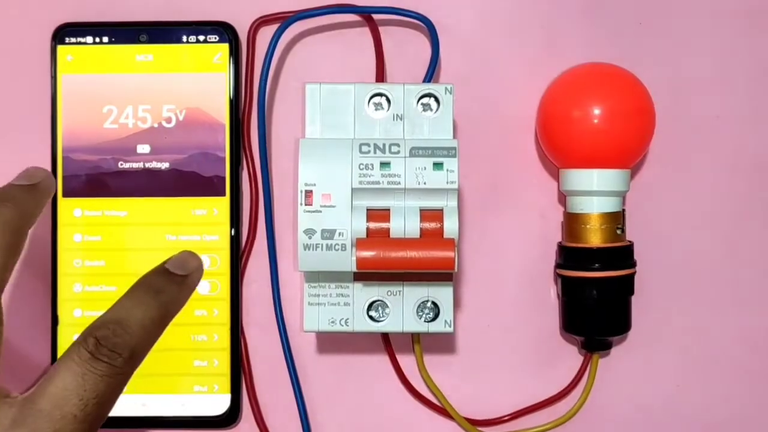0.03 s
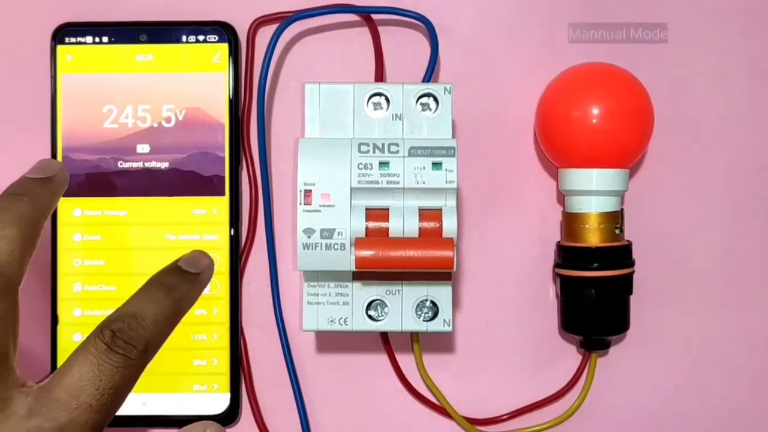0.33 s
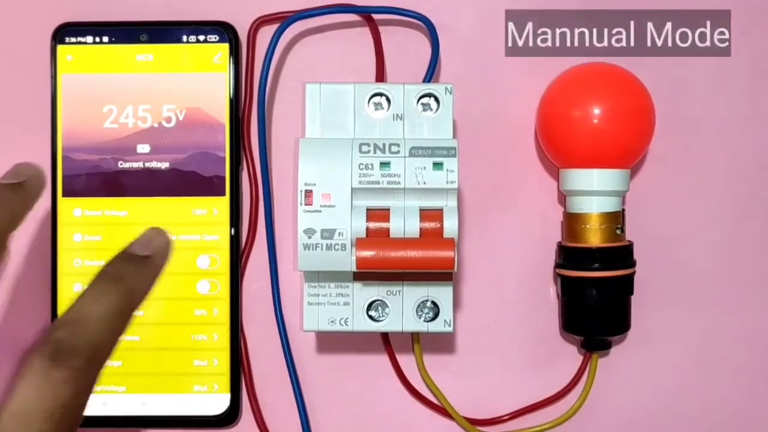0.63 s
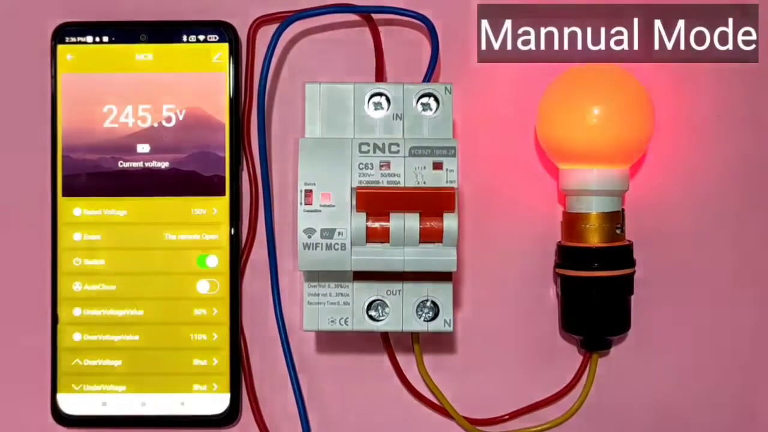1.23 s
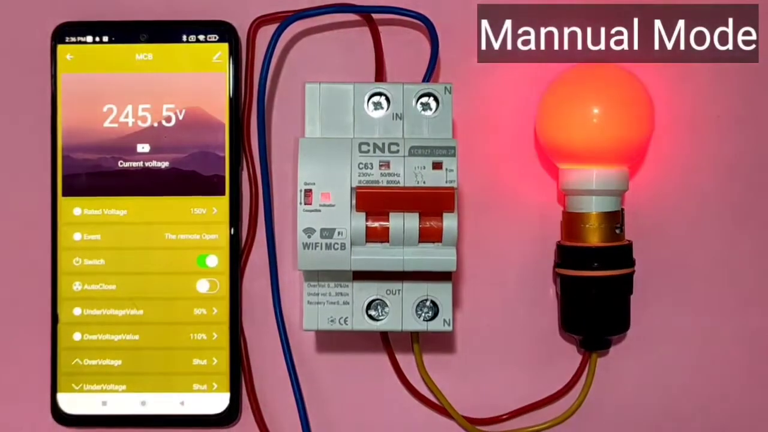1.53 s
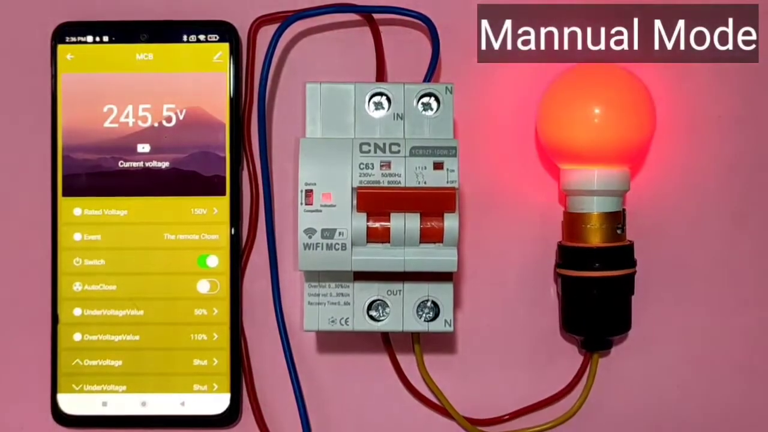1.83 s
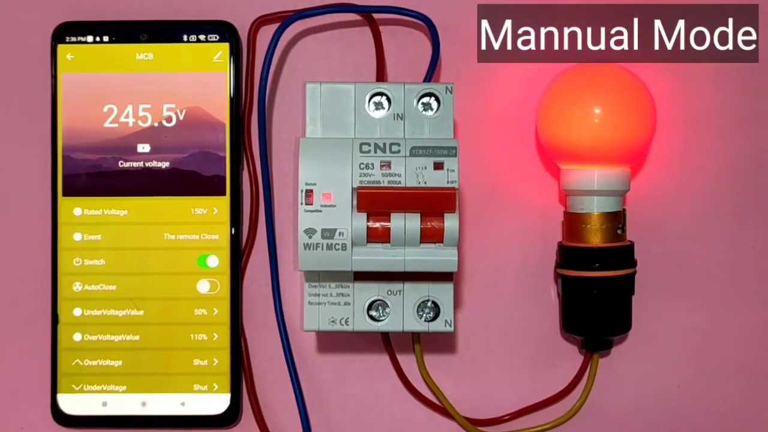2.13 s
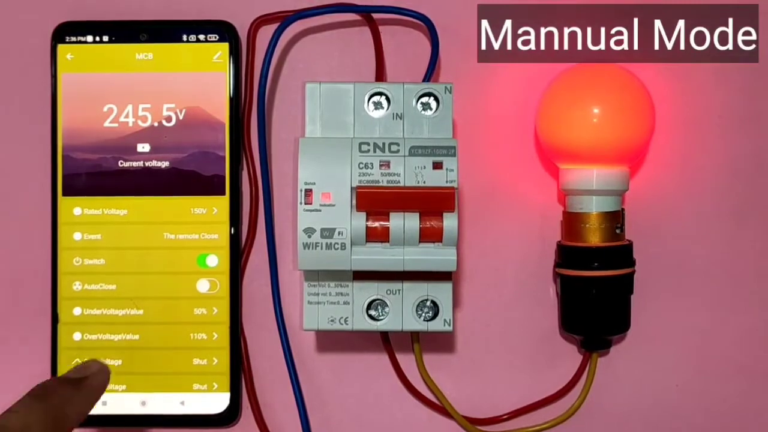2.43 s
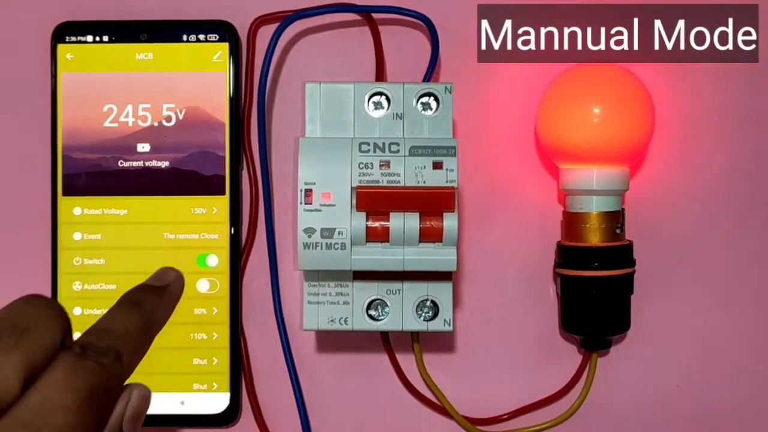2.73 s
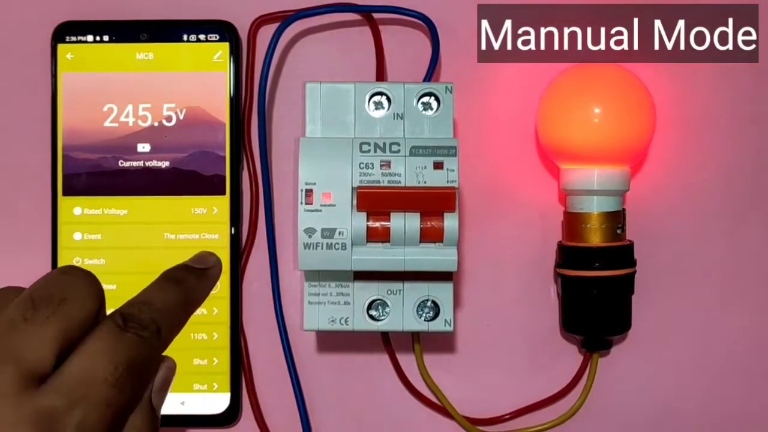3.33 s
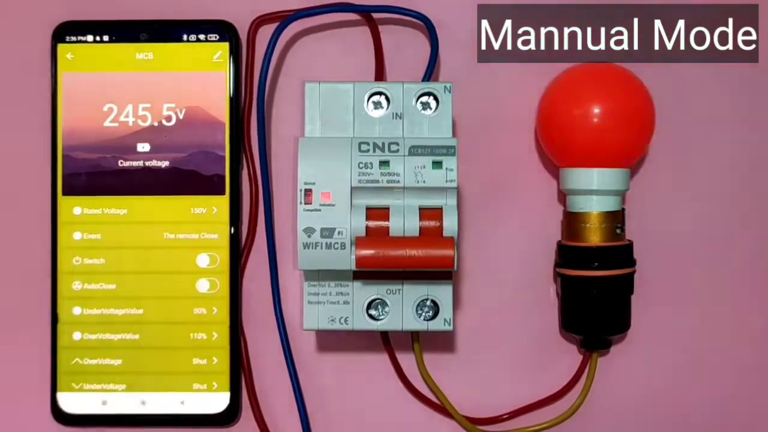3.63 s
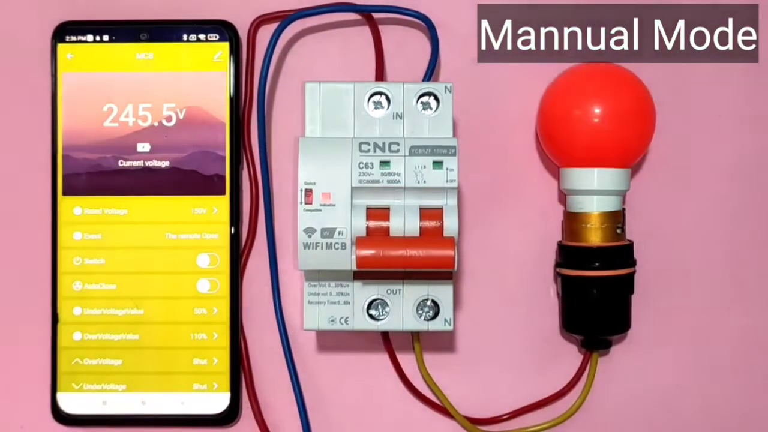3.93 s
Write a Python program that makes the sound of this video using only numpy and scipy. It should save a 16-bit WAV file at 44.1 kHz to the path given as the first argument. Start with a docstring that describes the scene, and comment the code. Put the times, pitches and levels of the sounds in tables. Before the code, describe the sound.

A circuit breaker's small motor whirrs briefly; later the breaker trips with a sharp snap.

```python
"""A motorised circuit breaker on a table in a small room. Its geared motor whirrs, slows under the
spring and latches the lever on. Later it runs briefly and trips the latch: the lever snaps off with a
crack from the case and a thud from the table. Behind it: a fan's hum, a far bird, a fingertip on a
touch screen. The right microphone is covered and hears little but bass."""
import sys
import numpy as np
from scipy import signal
from scipy.fft import rfft, irfft
from scipy.io import wavfile

SR = 44100
rng = np.random.default_rng(int(sys.argv[2]) if len(sys.argv) > 2 else 0)


def pcm_store(signal):
    """Save signal as 16-bit PCM."""
    levels = np.round(np.clip(np.atleast_2d(signal), -1, 1) * 32767)
    wavfile.write(sys.argv[1], SR, levels.astype(np.int16).T)


N = 176400
TIME = np.arange(N) / SR


def from_db(db):
    """Decibels to gain."""
    return 10 ** (np.asarray(db) / 20)


def unit_rms(x):
    """Scale to rms 1."""
    return x / np.sqrt(np.mean(x ** 2) + 1e-20)


def at_hz(points, hz):
    """Interpolate a table over log frequency."""
    knots_hz, values = np.transpose(points)
    return np.interp(np.log(np.maximum(hz, 1)), np.log(knots_hz), values)


def colour(x, spectrum):
    """Minimum-phase filter with the given gains."""
    size = 2 * N
    gain = from_db(at_hz(spectrum, np.arange(N + 1) * SR / size))
    cepstrum = irfft(np.log(gain))
    cepstrum[1:N] *= 2
    cepstrum[N + 1:] = 0
    return irfft(rfft(x, size) * np.exp(rfft(cepstrum)))[:N]


def noise(spectrum):
    """Coloured noise, rms 1."""
    gain = from_db(at_hz(spectrum, np.arange(N // 2 + 1) * SR / N))
    return unit_rms(irfft(rfft(rng.standard_normal(N)) * gain))


def drift(corner_hz):
    """Low-passed noise, rms 1."""
    hz = np.arange(N // 2 + 1) * SR / N
    return unit_rms(irfft(rfft(rng.standard_normal(N)) / (1 + (hz / corner_hz) ** 2)))


def decay(t, t60_s):
    """Step to 1 at t = 0, then exponential decay."""
    return (t >= 0) * np.exp(-np.log(1000) * np.clip(t / t60_s, 0, 10))


def room(x, delay_s=.0037, build_s=.0076):
    """Diffuse reverberation; the treble dies first."""
    # room decay (frequency [Hz], t60 [s])
    bands = [(200, .32), (1400, .33), (4000, .275), (8000, .235), (15000, .175)]
    t, hz = TIME[:SR // 2], np.arange(SR // 4 + 1) * 2
    white, tail = rfft(rng.standard_normal(len(t))), 0
    for k, (_, t60_s) in enumerate(bands):
        share = at_hz([(band[0], j == k) for j, band in enumerate(bands)], hz)
        tail += irfft(white * share, len(t)) * decay(t, t60_s)
    tail *= np.clip((t - delay_s) / build_s, 0, 1)
    return signal.fftconvolve(x, tail / np.sqrt(np.sum(tail ** 2)))[:N]


def background(drone_hz=93.6, whistle_hz=3280):
    """Room noise; on the left also a fan's drone and wavering lines, and a brief thin whistle."""
    # fan lines (frequency [Hz], width [Hz], level [dB])
    fan_lines = [(602, 6.4, -74.5), (923, 15, -77), (1604, 14, -74.5), (2284, 40, -75.5), (2770, 50, -77)]
    # room noise per microphone (frequency [Hz], relative density [dB])
    air_left = [(20, -2), (32, -7), (45, -6), (95, -12.5), (170, -17), (330, -28), (550, -28.5), (800, -33),
                (1600, -35), (2000, -37.5), (2800, -37), (3200, -43.5), (5500, -48), (9000, -49),
                (15500, -52.5)]
    air_right = [(20, 0.5), (31, -5.5), (46, -0.5), (75, -9), (150, -17.5), (400, -26), (1000, -32.5),
                 (5000, -37), (15500, -36)]
    # background level, dipping briefly after each loud sound (time [s], gain [dB])
    level_curve = [(0, -0.75), (.5, 0), (.9, 1), (1.23, 1.5), (1.32, -1), (1.65, 0.45), (3.7, -0.03),
                   (3.85, -0.5), (4, 0.5)]
    fan = 0
    for hz, width_hz, db in fan_lines:
        phase = 2 * np.pi * hz * TIME
        fan += from_db(db) * (drift(width_hz) * np.sin(phase) + drift(width_hz) * np.cos(phase))
    drone = from_db(-57.5) * np.sqrt(2) * np.sin(2 * np.pi * drone_hz * TIME + drift(2))
    swell = np.sin(np.interp(TIME, (.02, .2), [0, np.pi]))
    whistle = from_db(-74) * np.sqrt(2) * swell * np.sin(2 * np.pi * whistle_hz * TIME)
    left = from_db(-48.5) * noise(air_left) + fan + drone + whistle
    right = from_db(-60.5) * noise(air_right)
    return np.array([left, right]) * from_db(np.interp(TIME, *np.transpose(level_curve)))


def bird(pitch_bend=.03):
    """Far whistled notes, each arching in pitch and level."""
    # notes (start [s], length [s], top pitch [Hz], level [dB])
    notes = [(2.071, 0.064, 936, -63.5), (2.174, 0.094, 1174, -63.5), (2.342, 0.15, 1212, -65)]
    out = 0
    for start_s, length_s, hz, db in notes:
        arch = np.sin(np.pi * np.clip((TIME - start_s) / length_s, 0, 1))
        pitch_hz = hz * (1 + pitch_bend * (arch - 1))
        out += from_db(db) * np.sqrt(2) * arch * np.sin(2 * np.pi * np.cumsum(pitch_hz) / SR)
    return out


def finger():
    """A fingertip brushes a touch screen: soft swishes, quick rise, slow fade."""
    # strokes (start [s], length [s], centre [Hz], level [dB])
    strokes = [(0.524, 0.26, 4000, -66.5), (2.853, 0.073, 7600, -64.5)]
    out = 0
    for start_s, length_s, hz, db in strokes:
        envelope = np.interp(TIME - start_s, [0, length_s / 10, length_s], [0, 1, 0])
        out += from_db(db) * noise([(hz / 2, -14), (hz, 0), (hz * 2, -20)]) * envelope
    return out


def table_thud(start_s=3.598, rise_s=.0045):
    """The trip shakes the table; its modes reach each microphone differently."""
    # table modes (frequency [Hz], left [dB], right [dB], t60 [s])
    modes = [(45.4, -52.5, -26, 0.68), (106.2, -32.5, -37.5, 0.24), (124.5, -20, -45, 0.16),
             (168.5, -28.5, -46, 0.18), (200.4, -39, -26.5, 0.16), (320.5, -41.5, -30, .12)]
    t, out = TIME - start_s, 0
    for k, (hz, left_db, right_db, t60_s) in enumerate(modes):
        ring = (-1) ** k * decay(t, t60_s) * np.sin(2 * np.pi * hz * t)
        out += from_db([[left_db], [right_db]]) * ring
    return out * np.clip(t / rise_s, 0, 1)


def flutter(t, spread_db=2.2, step_s=.022):
    """Random gain from uneven tooth mesh."""
    knots_s = np.arange(0, N / SR, step_s)
    return from_db(spread_db * np.interp(t, knots_s, rng.standard_normal(len(knots_s))))


def gear_tones(t, rotor_hz, angle):
    """Rotor orders sweep through the gearbox resonances; rms 1."""
    # gearbox response (frequency [Hz], gain [dB])
    gearbox = [(2300, -13.5), (2900, -16.5), (3450, -7.5), (3900, -18), (4500, -18), (5000, -9),
               (5500, -12.5), (6150, -0.5), (6800, -2.5), (7300, -4.5), (7850, 0.5), (8600, -2),
               (9300, -12.5), (10200, -16.5), (11000, -12), (12500, -20.5), (15500, -30)]
    # strong and weak orders (rotor multiple, gain [dB])
    accents = [(9, 6.5), (10, 3), (11, 4.5), (13, 2), (14, -9), (15, -3), (21, 2.5), (23, 3.5)]
    accent_db = {round(order): db for order, db in accents}
    out = 0
    for order in range(6, 40):
        gain = from_db(at_hz(gearbox, order * rotor_hz) + accent_db.get(order, 0))
        out += gain * flutter(t) * np.sin(order * angle + rng.uniform(0, 2 * np.pi))
    return unit_rms(out)


def motor(run, poles=3, free_hz=485, jitter=.002, grit_db_per_hz=.0326, fade_s=.004):
    """Pole whine and rotor imbalance, plus a rasp of hum, gear tones and grit that grows with load."""
    # low orders (rotor multiple, level re rasp [dB])
    low_orders = [(2, -15.5), (4, -11), (5, -16.5)]
    # brush and tooth friction (frequency [Hz], gain [dB])
    friction = [(250, -18), (420, -13), (650, -21.5), (1200, -11), (1900, -4.5), (2600, -8.5), (3400, -11),
                (4500, -15.5), (6200, -6.5), (7000, -4.5), (8200, 0), (10000, -7), (12000, -10.5),
                (15500, -21)]
    knots_s, *columns = np.transpose(run)
    on = (TIME > knots_s[0]) & (TIME < knots_s[-1])
    t = TIME[on]
    rotor_hz, whine_db, rasp_db = (np.interp(t, knots_s, column) for column in columns)
    angle = 2 * np.pi * np.cumsum(rotor_hz * (1 + jitter * drift(corner_hz=82)[on])) / SR
    imbalance = from_db(-13.5) * np.sin(angle)
    whine = np.sqrt(2) * (np.sin(poles * angle) + imbalance)
    hum = sum(from_db(db) * flutter(t) * np.sin(round(order) * angle) for order, db in low_orders)
    gears = from_db(-2) * gear_tones(t, rotor_hz, angle)
    grit = unit_rms(noise(friction)[on] * (1 + .53 * np.cos(poles * angle)))
    grit_db = -8 + grit_db_per_hz * (free_hz - rotor_hz)
    rasp = hum + gears + from_db(grit_db) * grit
    out = np.zeros(N)
    out[on] = from_db(whine_db) * whine + from_db(rasp_db) * rasp
    return out * np.clip(np.minimum(TIME - knots_s[0], knots_s[-1] - TIME) / fade_s, 0, 1)


def latch(start_s=1.1475):
    """Light click as the latch catches the rising lever."""
    # click spectrum (frequency [Hz], gain [dB])
    spectrum = [(1000, -14), (3000, -6), (4500, -12), (5700, -2.5), (7200, -2), (9000, -10), (15500, -24)]
    return from_db(-28) * noise(spectrum) * decay(TIME - start_s, t60_s=.022)


def trip():
    """Lever and contacts strike the plastic case: a crack, a clink and a faint high ring per blow."""
    # blows (time [s], level [dB], t60 [s], clink re crack [dB])
    blows = [(3.5962, -12, 0.023, -3.5), (3.5978, -6, .016, -1), (3.5990, -6, 0.012, 1),
             (3.6051, -8, .021, -12), (3.6089, -21, .03, -10)]
    # case crack and contact clink (frequency [Hz], gain [dB])
    case_spectrum = [(150, -16), (400, -22), (650, -22), (950, -2), (1300, -8), (2000, -6), (2600, -12),
                     (3500, -3), (4700, 0), (5800, -3), (7900, -1.5), (9500, -3), (11500, -9), (15500, -15)]
    clink_spectrum = [(5000, -34), (7000, -9), (7700, -0.5), (8600, -1.5), (9500, -11), (14000, -35)]
    # faint high tones that ring on briefly after each blow (frequency [Hz], level re blow [dB])
    ring_modes = [(3555, -35), (4612, -32.5), (5110, -38), (5405, -35), (6780, -35.5), (7380, -33),
                  (7660, -31), (8775, -33.5)]
    crack, clink = noise(case_spectrum), noise(clink_spectrum)
    t, out = TIME[:SR // 4], np.zeros(N)
    for k, (start_s, blow_db, t60_s, clink_db) in enumerate(blows):
        ring = sum(from_db(db) * rng.choice([-1, 1]) * np.sin(2 * np.pi * hz * t)
                   for hz, db in ring_modes)
        fresh = slice(k * len(t), (k + 1) * len(t))
        burst = (crack[fresh] + from_db(clink_db) * clink[fresh]) * decay(t, t60_s)
        start = int(start_s * SR)
        out[start:start + len(t)] += from_db(blow_db) * (burst + ring * decay(t, t60_s=.11))
    return out


def snap_reverb(directions):
    """The case radiates a different crack in each direction; the room blends them."""
    return sum(room(latch() + trip()) for _ in range(directions)) / np.sqrt(directions)


def scene(soft_room_db=-9.5, snap_room_db=-6.5):
    """Breaker and room at the open (left) and covered (right) microphone."""
    # motor runs (time [s], rotor speed [Hz], whine [dB], rasp [dB])
    run_on = [(.889, 249.6, -66, -52), (.915, 412.6, -49, -39.5), (.93, 460.5, -38.5, -40),
              (.978, 485.3, -35, -38.5), (1.015, 496.8, -35, -40), (1.028, 478, -32, -36),
              (1.043, 420.7, -47, -39.5), (1.078, 413.4, -41, -38), (1.104, 380.2, -51, -40),
              (1.122, 381, -44.5, -38), (1.144, 443.7, -42, -39.5), (1.166, 471.6, -35, -37.5),
              (1.18, 472, -73, -39)]
    run_off = [(3.553, 129.5, -68.5, -56), (3.565, 264.3, -59, -45.5), (3.575, 399, -49, -41),
               (3.585, 446, -41, -39.5), (3.596, 457, -40.5, -40.5), (3.62, 473, -35.5, -43.5),
               (3.645, 472, -32, -46.5)]
    # airborne sound through the cover (frequency [Hz], gain [dB])
    cover = [(100, -0.5), (480, -6.5), (800, -11.5), (1400, -37), (2500, -38.5), (5000, -51), (15000, -43)]
    soft = motor(run_on) + motor(run_off) + finger() + bird()
    direct = soft + latch() + trip()
    left = direct + from_db(soft_room_db) * room(soft) + from_db(snap_room_db) * snap_reverb(3)
    right = direct + from_db(soft_room_db) * room(soft) + from_db(snap_room_db) * snap_reverb(1)
    return np.array([left, colour(right, cover)]) + table_thud() + background()


def record(dry, ceiling=.73, cutoff_hz=15600):
    """Soft overload on the peaks, then a steep low-pass."""
    limited = dry / (1 + (dry / ceiling) ** 4) ** .25
    return signal.sosfilt(signal.ellip(10, .1, 80, cutoff_hz, fs=SR, output="sos"), limited)


dry = scene()
out = record(dry)
pcm_store(out)
```